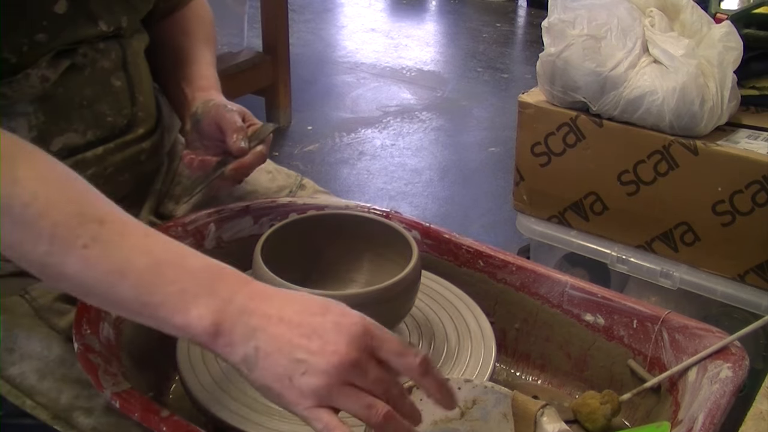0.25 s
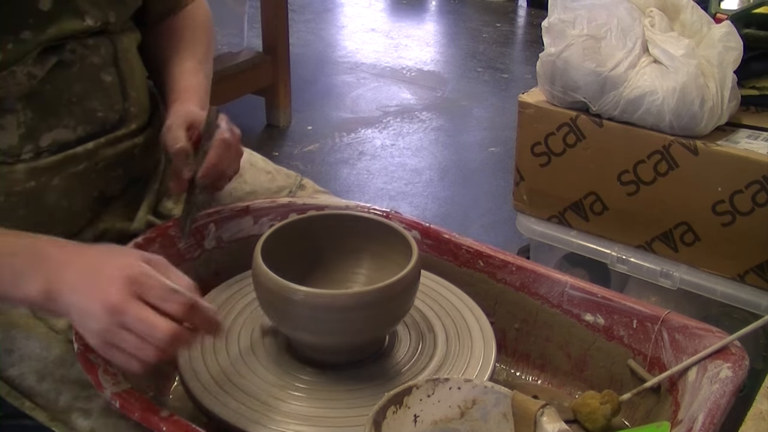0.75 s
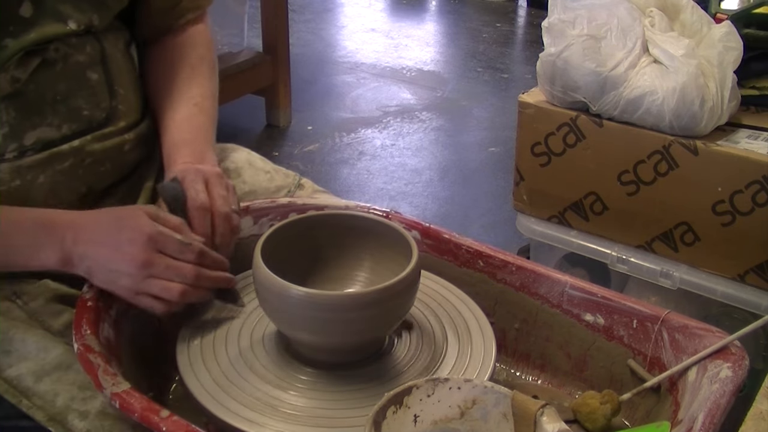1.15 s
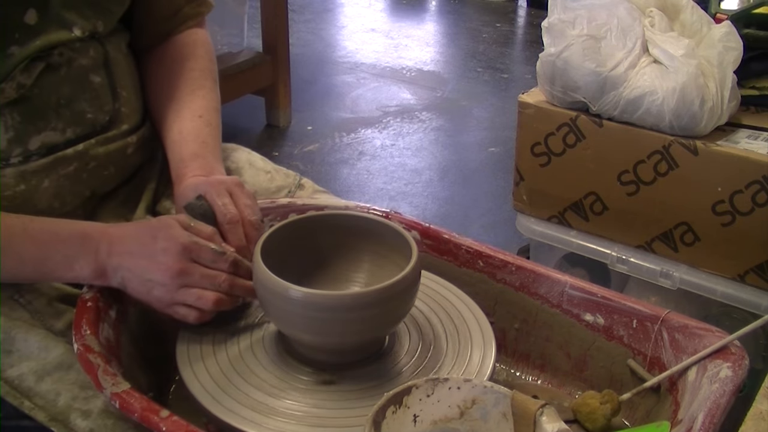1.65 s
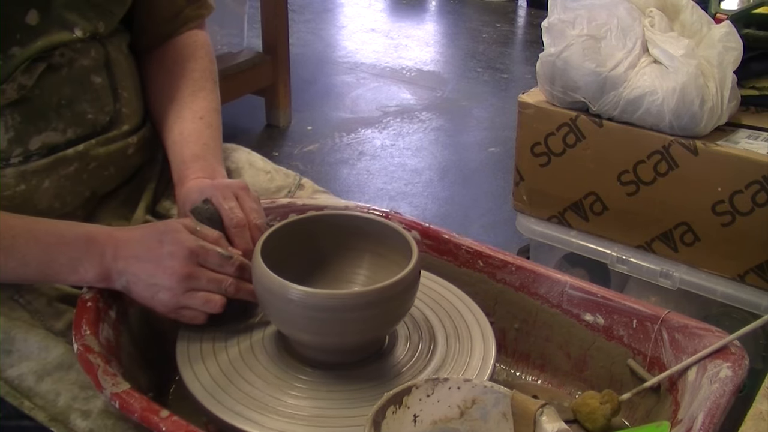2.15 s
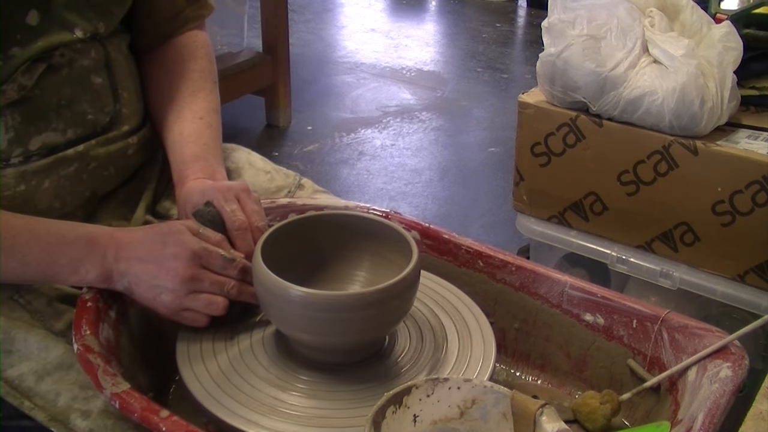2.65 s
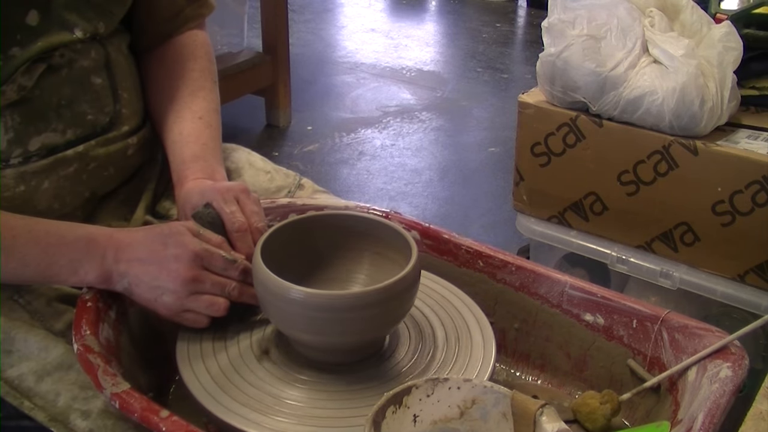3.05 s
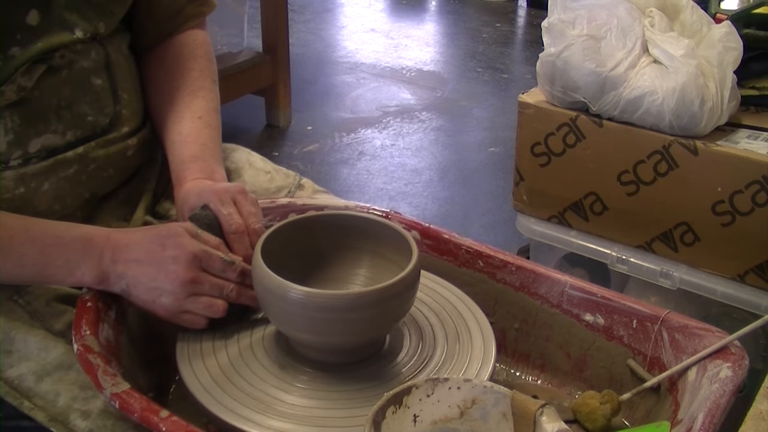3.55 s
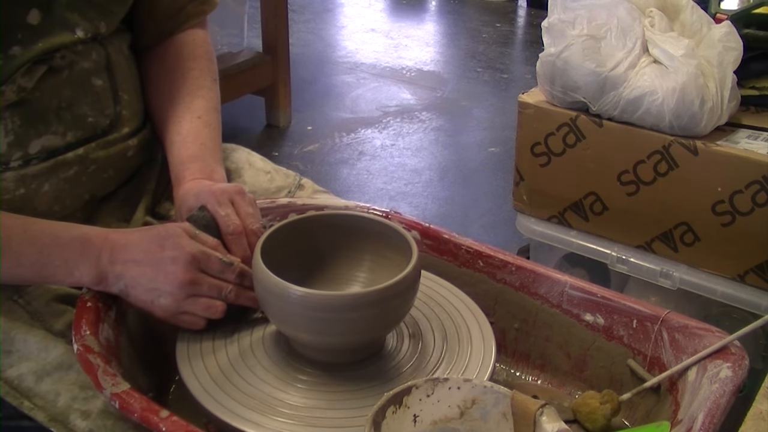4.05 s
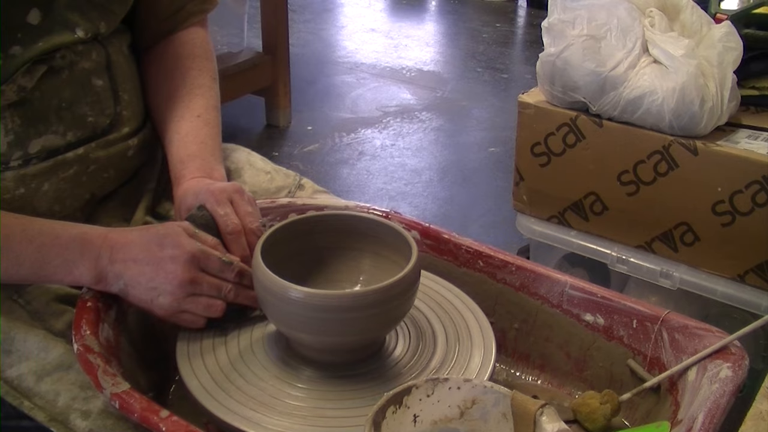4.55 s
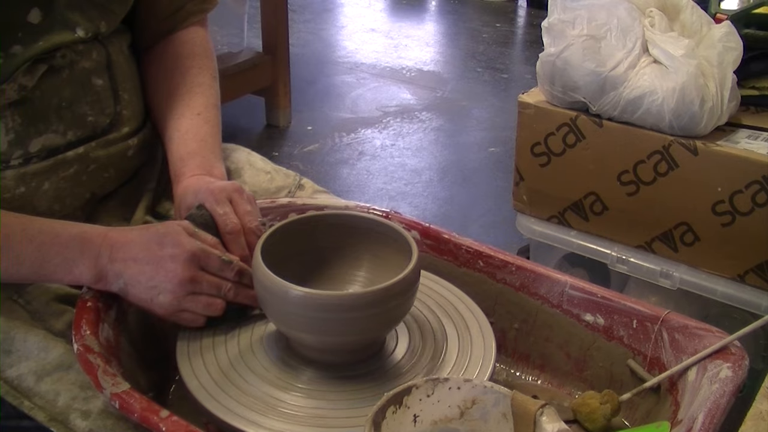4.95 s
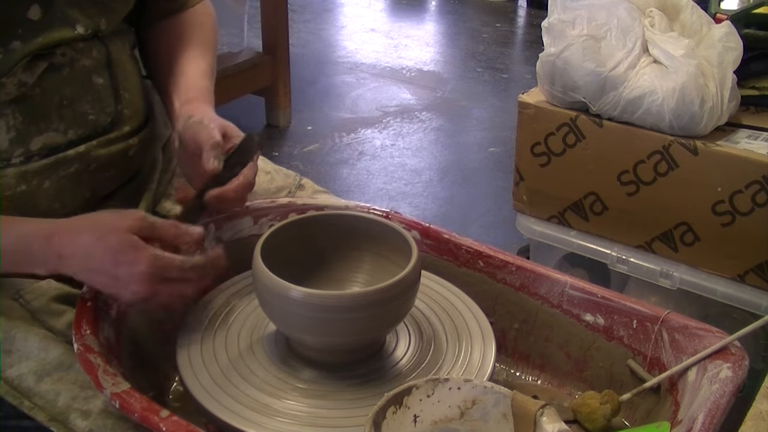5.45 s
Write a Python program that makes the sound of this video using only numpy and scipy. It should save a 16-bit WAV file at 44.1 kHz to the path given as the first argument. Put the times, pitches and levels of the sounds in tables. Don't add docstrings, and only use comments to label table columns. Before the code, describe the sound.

An electric pottery wheel runs from start to finish: a steady buzzing hum strongest near 500 Hz, slightly wavering in loudness, over a hollow tray rumble around 350 Hz and a faint rotor whine. At about 0.1 s wet hands give a dull rub with a cluster of tiny clicks and knocks; a tool knocks at 0.4 s, and isolated rubs and wet ticks continue faintly until 2.2 s. Grit begins to graze around 2.4 s, and at 2.5 s a wooden rib bites, making a loud, dry, continuous scrape with crackling grains until 3.3 s. From about 3.8 s it turns rougher and brighter, pushed hardest near 4 s, then thinner and hissier as the rib tilts, with fluttering metallic squeals near 2.4 and 3.4 kHz. At 5.26 s it skids off abruptly. Sharp wet ticks and knocks follow at 5.3-5.4 and 5.6 s. Close microphone, short room echo.

```python
import sys
import numpy as np
from scipy import signal
from scipy.fft import rfft, irfft
from scipy.io import wavfile
from scipy.ndimage import uniform_filter1d, map_coordinates

SR = 44100
rng = np.random.default_rng(int(sys.argv[2]) if len(sys.argv) > 2 else 0)


def inscribe(sig):
    pcm = np.round(np.clip(np.atleast_2d(sig).T, -1, 1) * 32767)
    wavfile.write(sys.argv[1], SR, pcm.astype(np.int16))


def linear_from_db(decibels):
    return 10 ** (np.asarray(decibels, float) / 20)


N = 250929
T = np.arange(N) / SR
F = np.arange(N // 2 + 1) * SR / N + 1

# (multiple of the hum pitch, level against the rumble [dB])
HUM_TONES = [(1, -31), (3, -16.5), (7, -24)]
# (time [s], level of the strongest hum tone [dB])
MOTOR_LOAD = [(0, -34), (.24, -30), (.5, -33.5), (.8, -31), (1.15, -32.5), (1.45, -31.5), (1.7, -27.5),
              (2.05, -31), (2.8, -29), (3.06, -24.5), (3.45, -29), (3.85, -26), (4.6, -27.5), (4.92, -29),
              (5.35, -28.5), (5.55, -25), (5.69, -27)]
# (pitch [Hz], level against the rumble [dB])
ROTOR_WHINE = [(1297, -60), (1398, -48.5), (1497, -56), (1599, -57), (1927, -63), (2051, -64), (2245, -58),
               (2270, -62), (2293, -56.5)]
# (frequency [Hz], level per Hz [dB])
RUMBLE_BED = [(15, -83), (25, -52), (84, -31.5), (140, -16), (298, -8.5), (435, -4.5), (497, -5), (554, -4),
              (1210, -22), (1420, -24), (1720, -25.5), (2250, -25.5), (2500, -32), (4290, -33),
              (15600, -42)]
# (frequency [Hz], width [Hz], level [dB])
TRAY_MODES = [(236, 11.7, -0.5), (336, 24, 0.5), (357.8, 12.7, 7), (426, 35, -7), (625, 9.2, -38),
              (2210, 130, -19.5)]
# (time of loudest moment [s], level [dB], swell [dB per s], fade [dB per s])
HAND_RUBS = [
    [(.112, -33.5, 98, 83), (.4, -61, 90, 289), (.646, -44.5, 166, 450), (1.0, -44.5, 35, 16)],
    [(.8, -52.5, 400, 29), (.93, -48.5, 44, 52)],
    [(2.45, -52, 33, 300), (5.3, -33, 900, 106), (5.6, -49, 85, 180)],
]
# (frequency [Hz], level per Hz [dB])
HAND_COLOURS = [
    [(410, -21.5), (700, -5.5), (757, 6), (908, -18), (981, -4), (1120, -7), (1810, -9), (2250, -11.5),
     (3990, -14), (15600, -30.5)],
    [(1470, -14), (2500, 0), (2760, -3), (3220, -7), (3640, -2.5), (4180, -6), (4510, 2), (4910, -10),
     (6620, -7), (7840, -11), (9070, -5), (10100, -9), (10800, -14.5), (14900, -22), (15600, -16)],
    [(1060, -24), (1800, 3), (2080, -1.5), (3360, -1), (4530, 1), (5090, -3.5), (11900, -15), (15600, -23)],
]
# (time [s], peak level [dB], centre frequency [Hz], time to fade by 60 dB [s])
WET_TICKS = [(0.02, -25, 2730, 0.014), (0.045, -26, 3000, 0.02), (0.0497, -25, 1800, 0.02),
             (.076, -32, 3200, .02), (0.098, -21, 4170, 0.014), (0.103, -21, 2480, 0.013),
             (0.111, -18, 2760, 0.007), (0.117, -14, 2820, 0.0092), (0.126, -18, 2750, 0.015),
             (0.6443, -25, 3690, 0.013), (0.682, -25, 2720, 0.0082), (0.733, -33, 2840, 0.013),
             (1.447, -33, 700, .03), (0.993, -23, 3200, 0.014), (1.777, -32, 4150, 0.015),
             (1.9083, -26, 4380, 0.011), (1.79, -39, 5200, 0.011), (1.993, -34.5, 9000, 0.013),
             (2.2174, -40, 8000, 0.04), (5.31, -23, 2600, 0.011), (5.3215, -13, 3500, 0.01),
             (5.335, -24, 3480, .01), (5.3413, -22, 4500, 0.014), (5.347, -22, 8700, 0.012),
             (5.3518, -13.5, 3360, 0.012), (5.3587, -17, 3550, 0.015), (5.3694, -17, 4090, 0.013),
             (5.3856, -18, 3380, 0.011), (5.4794, -26, 4150, 0.014), (5.556, -34, 3280, 0.015),
             (5.5687, -24, 3374, 0.013), (5.583, -15, 2610, 0.0083), (5.601, -25, 6750, 0.0086)]
# (time [s], peak level [dB], pitch [Hz], time to fade by 60 dB [s], noise against the tone [dB])
TOOL_KNOCKS = [(.05, -36, 700, 0.029, 11), (.076, -35, 910, 0.043, 5), (.101, -23.5, 480, 0.093, 2.5),
               (0.109, -38, 76, 0.19, 5), (0.116, -22, 420, 0.056, -3), (.127, -31, 600, .06, 3),
               (.118, -29, 767, 0.068, 0), (.433, -24, 994, 0.057, -16), (.432, -22, 740, 0.035, -8),
               (5.392, -15.5, 216, 0.022, -5), (5.393, -22, 493, 0.017, 7), (5.391, -25, 910, 0.012, 9),
               (5.392, -24, 1490, .01, 10.5), (5.586, -23.5, 600, 0.06, 2), (5.596, -21, 560, .05, -3),
               (5.6, -24.5, 1000, .03, 3.5)]
# (time [s], scrape level [dB])
RIB_PRESSURE = [
    (2.505, -25),
    (2.88, -24),
    (3.05, -27),
    (3.3, -23),
    (3.42, -25),
    (3.8, -25),
    (3.96, -21.5),
    (4.15, -26),
    (5.28, -23.5),
]
# (time [s], posture: 0 flat, 1 digging, 2 tilted)
RIB_POSTURE = [
    (2.3, 0),
    (3.3, .1),
    (3.76, .65),
    (3.83, 1),
    (4.1, 1),
    (4.35, 1.7),
    (4.7, 2),
    (5.36, 2),
]
# (posture, edge hiss against scrape [dB], low squeal [dB], high squeal [dB])
POSTURE_LEVELS = [(0, -5, -32, -56), (.1, -3.5, -26, -35), (.7, -0.5, -38, -47), (1, 4, -35, -37),
                  (1.7, 2, -39, -46), (2, 5.5, -37, -42)]
# (frequency [Hz], level per Hz [dB])
FLAT_BED = [(760, -23), (1300, -9), (1790, -6), (1990, -8.5), (2900, -20), (3390, -14), (3680, -15),
            (4040, -6), (4980, -0.5), (5640, -14), (8370, -9), (9790, -24), (10500, -12), (15600, -17)]
DIGGING_BED = [(760, -24), (1300, -14.5), (1790, 0.5), (2190, -4.5), (2350, -3), (2670, -5), (3210, -8),
               (4440, -8), (6870, -5), (8820, -2.5), (11100, -15), (13500, -10.5), (15600, -22)]
TILTED_BED = [(760, -62), (1300, -27), (1760, -8.5), (2210, -6), (2350, -13), (2560, -14), (3080, -13.5),
              (3320, -16.5), (4040, -10), (4770, 0.5), (5880, -11.5), (7620, -15.5), (13900, -14.5),
              (15600, -20)]
# (frequency [Hz], width [Hz], level [dB])
FLAT_MODES = [(1140, 30, -6), (1820, 82, -8), (2370, 28, -19), (2640, 180, -5), (2970, 55, -1),
              (3800, 99, -2), (4100, 25, -8), (4700, 170, -5), (4990, 280, 0), (5800, 100, -15),
              (6200, 60, -6), (6500, 120, -4), (6860, 80, -6), (7100, 37, -22), (7800, 130, -13),
              (8800, 36, -12), (9200, 49, -21), (10300, 230, -9), (11200, 44, -16), (11500, 57, -18),
              (13050, 230, -14), (12700, 37, -18), (12900, 67, -17), (14100, 100, -19), (15200, 72, -22)]
DIGGING_MODES = [(2385, 58, -0.5), (2970, 63, -7), (3740, 100, -1), (4450, 165, 4.5), (4910, 240, 4),
                 (5760, 88, 0), (6330, 87, -1.5), (7650, 180, 1.5), (8520, 45, 0), (9030, 61, 0.5),
                 (9800, 24, -10), (10340, 100, -5.5), (12040, 100, -10), (13300, 130, -6)]
TILTED_MODES = [(1800, 31, -3), (2160, 18, -17), (2390, 59, 0), (3410, 46, -3), (4770, 41, 1),
                (5430, 95, -39.5), (6000, 34, -2), (6570, 37, -2), (7570, 350, -3.5), (8440, 250, -7),
                (9430, 86, -9.5), (10060, 90, -15), (11500, 34, -18), (11000, 100, -30), (11600, 53, -21),
                (12100, 89, -21), (12000, 62, -17), (13500, 250, -12), (14900, 97, -25), (15400, 150, -22)]
# (time [s], tail level [dB], tail time to fade by 60 dB [s], crack level [dB])
GRIT_CATCHES = [(2.3796, -24, 0.059, -26), (2.4335, -10, 0.03, -8), (2.4605, -17, .02, -15),
                (2.4786, 0.5, 0.036, 4), (2.526, -8, .02, -10), (2.5366, -2, 0.046, 0),
                (2.689, -2.5, 0.053, -7), (2.7774, -1, 0.028, -6), (2.9204, 0.5, 0.095, 0),
                (3.099, -1.5, 0.092, -10), (3.1413, -5, 0.085, -12), (3.2098, 4, 0.09, 4),
                (3.2751, 1, 0.04, 2.5), (5.261, -3, 0.087, 0)]
# (pitch [Hz], level against the scrape [dB])
HEAD_TONES = [(2193.7, -28)]
# (ratio to its pitch, pitch wander [Hz], level [dB])
LOW_SQUEAL = [(1, 9, 0), (1.991, 22, -9)]
HIGH_SQUEAL = [(1, 9, 0), (1.83, 10, -7)]
# (start [s], length [s], level [dB], pitch [Hz])
LOW_LOCKS = [(3.51, 0.034, -33, 2377), (3.674, 0.063, -29, 2369), (3.809, 0.048, -32, 2379),
             (3.844, 0.033, -37, 2392), (3.889, 0.077, -29, 2376), (3.993, 0.038, -31, 2395),
             (4.04, 0.052, -33, 2403), (4.083, 0.033, -30, 2389), (4.134, 0.077, -32, 2404),
             (4.256, 0.14, -31.5, 2381), (4.4, 0.071, -26, 2370), (4.48, 0.04, -33, 2392),
             (4.513, 0.052, -29, 2386), (4.576, 0.032, -43, 2380), (4.645, 0.06, -36, 2390),
             (4.701, 0.03, -30, 2400), (4.766, 0.08, -30, 2388), (4.859, 0.032, -34, 2401),
             (4.885, 0.09, -29, 2388), (4.973, 0.042, -26, 2385), (5.031, 0.27, -30, 2377),
             (5.28, 0.04, -30, 2370)]
HIGH_LOCKS = [(4.23, .032, -37, 3382), (4.29, .03, -40, 3380), (4.41, .04, -38, 3390),
              (4.556, .032, -39, 3389), (4.691, .034, -37, 3378), (4.788, 0.029, -34, 3388),
              (4.87, .036, -34.5, 3385), (4.924, 0.026, -40, 3388), (4.981, 0.029, -33, 3390),
              (5.046, .036, -30, 3387), (5.105, .036, -29.5, 3386), (5.15, .035, -32, 3380),
              (5.195, .04, -33, 3384), (5.25, .03, -37, 3390)]
# (start [s], length [s], level [dB], pitch [Hz])
HEAD_LOCKS = [(2.908, 0.048, -39, 1165), (3.204, 0.046, -35, 1140), (3.815, 0.029, -44, 1173),
              (3.89, 0.037, -44, 1157), (4.38, 0.053, -43, 1180), (4.567, 0.04, -42, 1174),
              (4.613, 0.035, -42, 1177)]
# (time [s], peak level [dB], lowest frequency [Hz], highest frequency [Hz], time to fade by 60 dB [s])
LIFT_SKID = (5.257, -16.5, 5600, 9200, 0.13)


def level(x, db):
    return x * linear_from_db(db) / np.sqrt(np.mean(x ** 2))


def curves(rows, at):
    first, *columns = np.transpose(rows)
    return [np.interp(at, first, column) for column in columns]


def colour(x, points=(), modes=(), points_db=0):
    power = 1e-9
    for hz, width, db in modes:
        power = power + linear_from_db(2 * db) / (1 + ((F - hz * hz / F) / abs(width)) ** 2)
    if len(points):
        hz, db = np.transpose(points)
        power = power + linear_from_db(2 * (np.interp(np.log(F), np.log(hz), db) + points_db))
    cepstrum = irfft(np.log(power) / 2, N)
    cepstrum[1:N // 2] *= 2
    cepstrum[N // 2:] = 0
    return irfft(rfft(x) * np.exp(rfft(cepstrum)), N)


def band(x, lo_hz, hi_hz):
    edges = [lo_hz, min(hi_hz, .45 * SR)]
    return signal.sosfilt(signal.butter(3, edges, "bandpass", fs=SR, output="sos"), x)


def walk(rate):
    hold = int(SR / rate)
    steps = np.repeat(rng.standard_normal(N // hold + 1), hold)
    return 1.3 * uniform_filter1d(uniform_filter1d(steps, hold), hold)[:N]


def wavering_tone(hz):
    return np.sin(2 * np.pi * np.cumsum(hz) / SR)


def grit(scatter_db, flicker_db):
    grains = rng.standard_normal(N) * linear_from_db(scatter_db * rng.exponential(size=N))
    flicker = flicker_db * walk(14) + flicker_db * walk(70)
    return level(grains * linear_from_db(flicker), 0)


def fade(s, t60, rise_s):
    t = np.maximum(T - s, 0)
    return (1 - np.exp(-t / rise_s)) * linear_from_db(-60 * t / max(t60, .004))


def weak_hum(phase):
    turn = 2 * np.pi * 1.32 * (T - .54)
    throb = .8 + .8 * np.cos(turn - .1) + .55 * np.cos(3 * turn)
    out = 0
    for multiple, db in HUM_TONES:
        strength = linear_from_db(db + (multiple > 2) * 2.0 * walk(5.6))
        tone = strength * np.sin(multiple * phase + rng.uniform(0, 2 * np.pi))
        out = out + tone * (throb if multiple < 2 else 1)
    return out


def rotor_whine():
    out = 0
    for hz, db in ROTOR_WHINE:
        strength = linear_from_db(db + 1.5 * walk(13) - 4.5 * np.exp(-(T / 0.62) ** 4))
        out = out + strength * wavering_tone(hz + 1.497 * walk(3))
    return out


def tray_rumble():
    return level(colour(rng.standard_normal(N), RUMBLE_BED, TRAY_MODES, points_db=3.5), -3.5)


def motor():
    load_db = curves(MOTOR_LOAD, T)[0]
    slow_load_db = uniform_filter1d(load_db, int(1.4 * SR))
    rumble_db = -26.5 + 1.23 * (slow_load_db + 28.5)
    phase = 2 * np.pi * 100.04 * T
    shaft = 1 + 2 * linear_from_db(-21.0) * np.cos(2 * np.pi * 24.3 * T) * linear_from_db(2.0 * walk(3.17))
    strong_hum = np.sqrt(2) * shaft * np.sin(5 * phase) * linear_from_db(load_db + 1.0 * walk(16))
    rest = 1.155 * linear_from_db(4.5) * weak_hum(phase) + linear_from_db(31.0) * rotor_whine() + tray_rumble()
    return strong_hum + rest * linear_from_db(rumble_db)


def hands():
    out = 0
    for rubs, points in zip(HAND_RUBS, HAND_COLOURS):
        effort = 0
        for s, db, swell, fading in rubs:
            effort = effort + linear_from_db(db - np.maximum(swell * (s - T), fading * (T - s)))
        out = out + effort * linear_from_db(5) * level(colour(grit(2.1, .9), points), 0)
    return out


def ticks(noise):
    bright = level(band(noise, 3800, 13300), -9)
    out = 0
    for s, db, hz, t60 in WET_TICKS:
        impulse = 1. * (np.arange(N) == int(s * SR))
        click = band(impulse, hz / 2, 14000) * linear_from_db(6.5)
        burst = level(band(noise, hz / 1.5, hz * 1.6), 0) + bright
        out = out + linear_from_db(db - 3) * (click + burst * fade(s, .7 * t60, .0002))
    return out


def knocks(noise):
    out = 0
    for s, db, hz, t60, noise_db in TOOL_KNOCKS:
        tone = np.sin(2 * np.pi * hz * (T - s))
        ring = tone + level(band(noise, hz / 1.5, hz * 1.5), noise_db)
        out = out + linear_from_db(db + 2.5) * ring * fade(s, t60, .0015)
    return out


def taps():
    noise = rng.standard_normal(N)
    return band(ticks(noise) + knocks(noise), 96, 26000)


def squeal(modes, locks, free_db, lock_db):
    start, length, db, pitch = np.transpose(locks)
    held = 0
    for s, d, g in zip(start, length, db):
        bump = np.sqrt(np.clip(1 - (2 * (T - s) / d - 1) ** 2, 0, 1))
        held = held + linear_from_db(g) * uniform_filter1d(bump, int(.012 * SR))
    hz = np.interp(T, start + length / 2, pitch)
    tones = 0
    for ratio, wander_hz, g in modes:
        tones = tones + linear_from_db(g + 2.7 * walk(110)) * wavering_tone(ratio * hz + wander_hz * walk(110))
    return (linear_from_db(free_db) + linear_from_db(lock_db) * held) * tones


def wheel_head(body_db, held_db, posture, low_db, high_db):
    ring = squeal(LOW_SQUEAL, LOW_LOCKS, low_db - 11, lock_db=1.5)
    ring = ring + squeal(HIGH_SQUEAL, HIGH_LOCKS, high_db - 5, lock_db=4.5)
    ring = ring + squeal([(1, 2.9, 0)], HEAD_LOCKS, body_db - 24.5, lock_db=2.0)
    singing = np.clip(linear_from_db(held_db + 28), 0, 1)
    thin = 0
    for hz, db in HEAD_TONES:
        thin = thin + linear_from_db(db + 3.0 * walk(20)) * np.sin(2 * np.pi * hz * T)
    return ring * singing + thin * linear_from_db(body_db + 6) * (.6 + posture / 2)


def pressure():
    early = np.maximum(RIB_PRESSURE[0][0] - T, 0)
    late = np.maximum(T - RIB_PRESSURE[-1][0], 0)
    held_db = curves(RIB_PRESSURE, T)[0] - 249 * early
    graze_db = -35 - 64 * early
    lift_db = 385 * late
    return np.maximum(held_db, graze_db) - lift_db, held_db - lift_db


def caught_grit():
    tails, cracks = 0, 0
    for s, tail_db, t60, crack_db in GRIT_CATCHES:
        tails = tails + linear_from_db(tail_db - 18.0) * fade(s, t60, 0.00066)
        cracks = cracks + linear_from_db(crack_db - 12.0) * fade(s, 0.0051, .0001)
    tail_noise = level(band(rng.standard_normal(N), 570, 11000), -2.06)
    crack_noise = level(band(rng.standard_normal(N), 1140, 6200), -1.7)
    return tails * tail_noise + cracks * crack_noise


def skid():
    s, db, lo_hz, hi_hz, t60 = LIFT_SKID
    return level(band(grit(1.7, 1.0), lo_hz, hi_hz), db) * fade(s, t60, 0.0024)


def rib():
    body_db, held_db = pressure()
    posture = curves(RIB_POSTURE, T)[0]
    edge_db, low_db, high_db = curves(POSTURE_LEVELS, posture)
    stream = grit(2.53, 0.25) * linear_from_db(body_db) + caught_grit()
    share = [np.sqrt(np.clip(1 - abs(posture - k), 0, 1)) for k in range(3)]
    flat = colour(stream * share[0], FLAT_BED, FLAT_MODES, points_db=-5.0) * linear_from_db(10)
    digging = colour(stream * share[1], DIGGING_BED, DIGGING_MODES, points_db=-5) * linear_from_db(10.5)
    tilted = colour(stream * share[2], TILTED_BED, TILTED_MODES, points_db=-1.0) * linear_from_db(13.5)
    rocked_time = T + .00035 * walk(14)
    rocking = map_coordinates(flat + digging + tilted, [rocked_time * SR], mode="mirror")
    body = band(rocking, 590, 5440)
    edge = band(rocking, 8180, 16100) * linear_from_db(.5 * edge_db + 2.5)
    return body + edge + skid() + wheel_head(body_db, held_db, posture, low_db, high_db)


def workshop(near):
    tail = rng.standard_normal(SR // 4) * linear_from_db(-60 * T[:SR // 4] / 0.21)
    return signal.fftconvolve(near, tail / np.sqrt(np.sum(tail ** 2)))[:N]


def scene():
    near = hands() + taps() + rib()
    mono = motor() + near + linear_from_db(-13) * workshop(near)
    return np.array([mono, mono])


def roll_off(x):
    return signal.sosfilt(signal.butter(12, 15780, fs=SR, output="sos"), x)


def record(dry):
    mono = signal.sosfilt(signal.butter(2, 45, "highpass", fs=SR, output="sos"), dry[0])
    # (lowest frequency [Hz], highest frequency [Hz], level that counts as quiet [dB])
    side_bands = [(4700, 5700, -59), (5700, 7000, -58.5), (7000, 9000, -57), (9000, 11500, -54),
                  (11500, 16000, -50)]
    side = 0
    for lo_hz, hi_hz, quiet_db in side_bands:
        strength = np.sqrt(uniform_filter1d(band(mono, lo_hz, hi_hz) ** 2, size=1500) + 1e-18)
        quiet = uniform_filter1d(1. * (strength < linear_from_db(quiet_db)), size=500)
        side_noise = level(band(rng.standard_normal(N), lo_hz, hi_hz), 0)
        side = side + linear_from_db(-6.5) * quiet * strength * side_noise
    pair = np.tanh(0.82 * np.array([mono + side, mono - side])) / 0.78
    pair = signal.sosfilt(signal.ellip(10, .1, 70, 15750, fs=SR, output="sos"), pair)
    return roll_off(pair)


dry = scene()
out = record(dry)
inscribe(out)
```